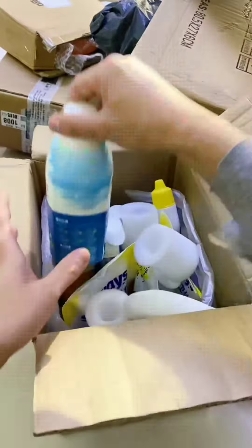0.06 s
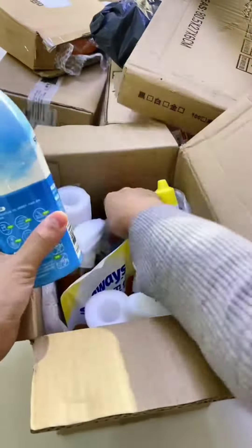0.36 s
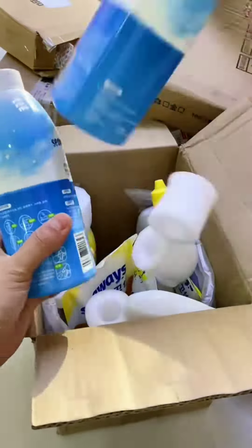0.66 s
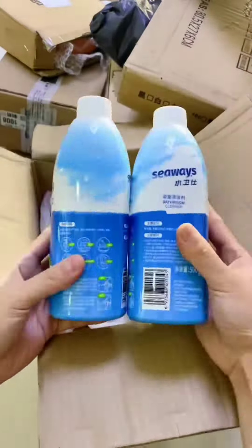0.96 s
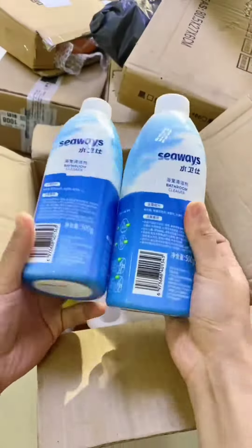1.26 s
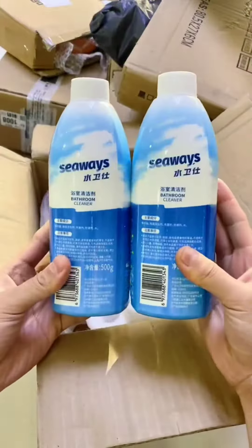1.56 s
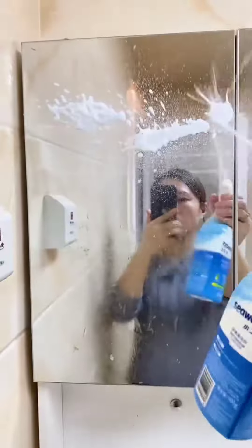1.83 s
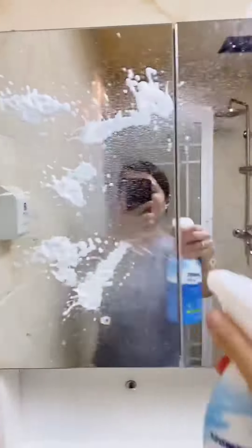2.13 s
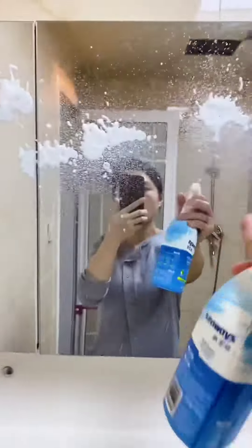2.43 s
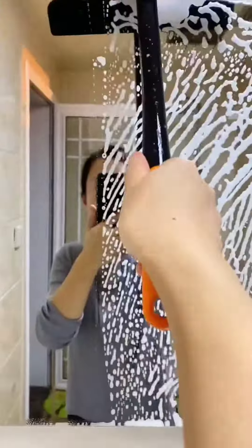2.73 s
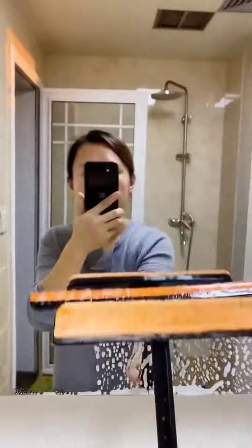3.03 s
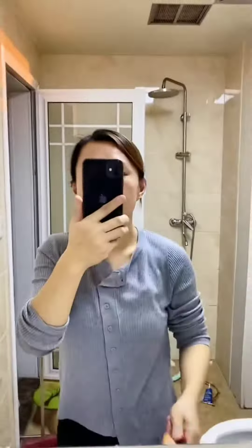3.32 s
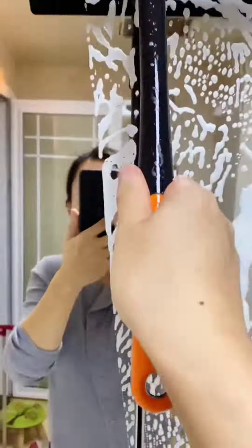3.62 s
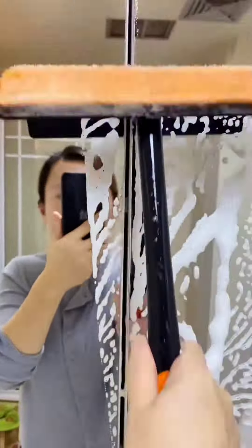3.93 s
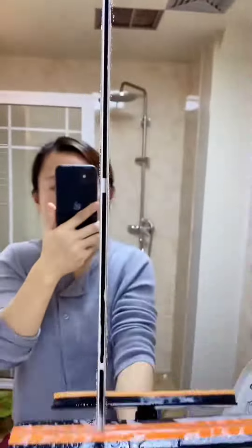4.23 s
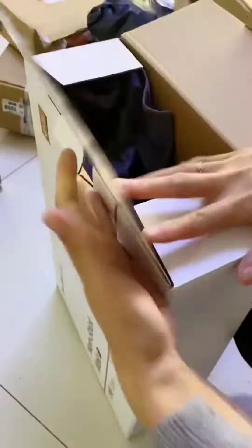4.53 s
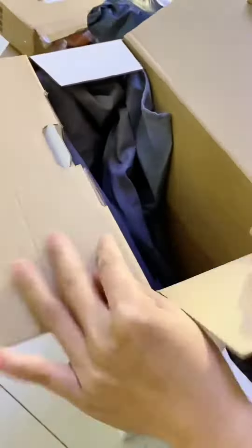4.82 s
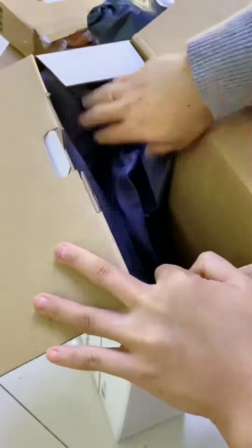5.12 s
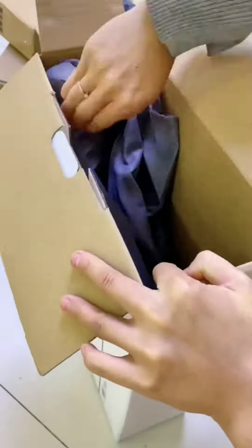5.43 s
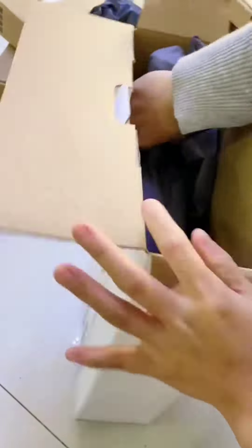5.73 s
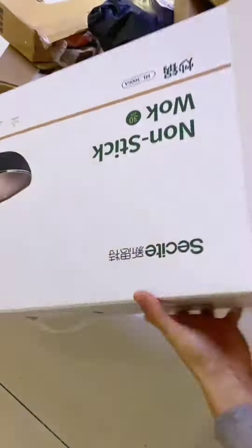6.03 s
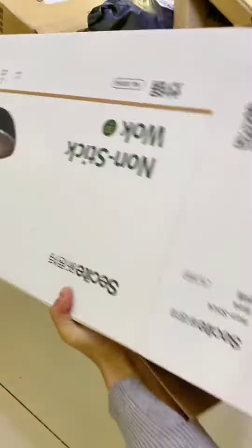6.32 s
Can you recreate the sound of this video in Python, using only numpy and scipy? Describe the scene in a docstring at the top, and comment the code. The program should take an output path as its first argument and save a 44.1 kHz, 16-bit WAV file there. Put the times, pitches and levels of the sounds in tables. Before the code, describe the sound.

Close indoor handling: tapping plastic bottles, rapid spray spurts, two booming squeegee strokes on glass, and a cardboard box being opened.

```python
"""First, plastic bottles rub and tap as they are lifted out of a carton; a full one swings by, rumbling.
From 1.6 s a trigger sprayer clicks and hisses foam onto a mirror. At 2.7 s and 3.7 s a rubber squeegee
sticks and slips down the glass, making it boom; between the two strokes it clacks against the mirror.
From 4.2 s the flaps of a cardboard box scrape, knock and crack open, and a smaller box is dragged out.
Everything is heard close up, in small rooms."""
import sys
import numpy as np
from scipy import signal
from scipy.fft import rfft, irfft
from scipy.io import wavfile
from scipy.ndimage import uniform_filter1d

SR = 44100
rng = np.random.default_rng(int(sys.argv[2]) if len(sys.argv) > 2 else 0)


def unload_audio(sound):
    """Save the sound as a 16-bit wav file, at the path given as the first command line argument."""
    columns = np.transpose(np.atleast_2d(sound))
    # keep every value between -1 and 1, then stretch to whole-number steps
    steps = np.round(np.clip(columns, -1, 1) * 32767)
    wavfile.write(sys.argv[1], SR, steps.astype(np.int16))


N = 285327
TIME, FREQS = np.arange(N) / SR, np.fft.rfftfreq(N, 1 / SR)
BRIEF = TIME[:SR // 5]  # the clock for one short sound
BRIEF_FREQS = np.fft.rfftfreq(len(BRIEF), 1 / SR)
HAND_ATTACK_S, HAND_RELEASE_S = 0.011, 0.038


def amp(db):
    """Turns decibels into a number to multiply by."""
    return 10 ** (np.asarray(db) / 20)


def evened(x):
    """Scales a signal to an average strength (rms) of 1."""
    return x / np.sqrt(np.mean(x ** 2) + 1e-20)


def read(points, hz):
    """Looks up a value between the rows of a frequency table."""
    f, value = np.transpose(points)
    return np.interp(np.log(hz + 1), np.log(f + 1), value)


def add(mix, s, sound):
    """Mixes a sound in at s seconds."""
    part = mix[max(round(s * SR), 0):][:len(sound)]
    part += sound[:len(part)]


def during(span):
    """Full volume from the start to the end of a span, silence outside it."""
    return amp(np.interp(TIME, span, [0, 0], left=-150, right=-150))


def above(hz, edge_hz):
    """A steep filter curve that lets through what is higher than the edge."""
    return 1 / np.sqrt(1 + (edge_hz / (hz + 1)) ** 10)


def shaped(x, curve):
    """Filters a full-length signal and sets its strength to 1."""
    return evened(irfft(rfft(x) * curve, N))


def noise(curve):
    """Fresh noise, coloured by a filter curve."""
    return shaped(rng.standard_normal(N), curve)


def tilted(tone, tilt_db, hz):
    """A tone colour made brighter or duller by tilt_db per octave, turning about 2 kHz."""
    return amp(read(tone, hz) + tilt_db * np.log2(np.maximum(hz, 300) / 2000))


def drift(hz):
    """A random wobble, up to about hz times a second."""
    return noise(np.exp(-(FREQS / hz) ** 2))


def progress(start, length):
    """Runs from 0 to 1 along a movement."""
    return np.clip((TIME - start) / length, 0, 1)


def stroke(start, length, attack_s, release_s, change_db):
    """Loudness of one movement: it gets going, steadily grows or weakens, and dies away."""
    slope = amp(change_db * (progress(start, length) - .5))
    fade = np.exp(-np.maximum(TIME - start - length, 0) / release_s)
    return progress(start, attack_s) * slope * fade


def grains(size, per_s, spread_db, smooth):
    """Friction: tiny random slips over a smooth hiss; spread_db makes their sizes more unequal."""
    slips = rng.standard_normal(size) * amp(spread_db * np.minimum(rng.exponential(1, size), 4))
    slips *= rng.random(size) < per_s / SR
    return evened(slips) + smooth * rng.standard_normal(size)


def rubbing(moves, tone, change_db, catch_db, per_s, spread_db):
    """Surfaces slide and catch: a low rumble, a scrape in the middle and a fizz on top."""
    rumble, scrape, fizz = np.zeros((3, N))
    for start, length, db, rumble_db, fizz_db in moves:
        effort = amp(db) * stroke(start, length, HAND_ATTACK_S, HAND_RELEASE_S, change_db)
        rumble = np.hypot(rumble, effort * amp(rumble_db))
        scrape = np.hypot(scrape, effort)
        fizz = np.hypot(fizz, effort * amp(fizz_db))
    slips = grains(N, per_s, spread_db, smooth=0.99) * amp(catch_db * drift(49))
    colour, mid, top = amp(read(tone, FREQS)), above(FREQS, 428), above(FREQS, 3630)
    return (rumble * noise(colour * np.sqrt(1 - mid ** 2))
            + scrape * shaped(slips, colour * mid * (1 - top))
            + fizz * shaped(slips, colour * top))


def contacts(rows, tone, gain_db, t60, crack, crack_s):
    """Hard hits: a sharp crack, then a noisy ring that takes t60 seconds to fade by 60 dB."""
    out = np.zeros(N)
    fade = amp(-60 * BRIEF / t60) + crack * np.exp(-BRIEF / crack_s)
    for s, db, tilt_db, *_ in rows:
        curve = np.maximum(evened(tilted(tone, tilt_db, BRIEF_FREQS)), 1e-4)
        # a minimum-phase filter, so nothing sounds before the hit
        log_curve = np.log(np.r_[curve, curve[-2:0:-1]])
        colour = np.exp(signal.hilbert(log_curve).conj())[:len(curve)]
        burst = rng.choice([-1, 1], len(BRIEF)) * fade
        add(out, s, amp(db + gain_db) * irfft(rfft(burst) * colour))
    return out


def ringing(hits, notes, swell_s, hold_s):
    """At each hit (t/s, level/dB) a thing's own notes swell, hold while it is pushed, then fade."""
    out, ring = np.zeros(N), np.zeros(len(BRIEF))
    for hz, db, t60 in notes:
        fade = amp(db - 60 * np.maximum(BRIEF - hold_s, 0) / t60)
        ring += fade * np.sin(2 * np.pi * (hz * BRIEF + rng.random()))
    for s, db in hits:
        add(out, s, amp(db) * np.minimum(BRIEF / swell_s, 1) * ring)
    return out


def thump(s, db, hz, swell_s, fall):
    """A blow on a hollow panel: high notes cross it first, so the pitch drops, passing hz early on."""
    out = np.zeros(N)
    pitch = hz * (.005 / (BRIEF + .0005)) ** fall
    push = BRIEF / swell_s * np.exp(1 - BRIEF / swell_s)
    add(out, s, amp(db - 1.04) * push * np.sin(2 * np.pi * np.cumsum(pitch) / SR))
    return out


def rattling(thumps):
    """Adds the buzz of loose layers that shake with each thump."""
    buzz = noise(above(FREQS, 170) / (1 + (FREQS / 690) ** 2) * (1 - above(FREQS, 1500)))
    return thumps + 0.23 * abs(thumps) * buzz


def slides(rows, tone, gain_db, per_s, spread_db, ring):
    """Quick scrapes: a burst of slips swells and fades, ringing the spot that it scrapes."""
    out, size, middle = np.zeros(N), len(BRIEF), BRIEF.mean()
    for s, db, length, spot_hz in rows:
        spot = 1 + ring / (1 + (np.log2((BRIEF_FREQS + 1) / spot_hz) / 0.47) ** 2)
        colour = amp(read(tone, BRIEF_FREQS)) * above(BRIEF_FREQS, 396) * spot
        slips = irfft(rfft(grains(size, per_s, spread_db, smooth=0.84)) * colour, size)
        swell = np.exp(-2 * ((BRIEF - middle) / length) ** 2)
        add(out, s - middle, amp(db + gain_db) * evened(slips) * swell)
    return out


def roaming(x, patchy_db):
    """As the touching point moves, other spots ring, so the tone colour shifts in patches."""
    spectrum = signal.stft(x, nperseg=512)[2]
    patches = uniform_filter1d(rng.standard_normal(spectrum.shape), size=4, axis=0)
    patches = uniform_filter1d(patches, size=6, axis=1)
    return signal.istft(spectrum * amp(patchy_db * evened(patches)), nperseg=512)[1][:N]


def still_air():
    """The faint, dull background of a quiet room."""
    return amp(-68) * noise(1 / (1 + FREQS / 400))


# tone colour of rubbed bottles: f/Hz, level/dB
BOTTLE_TONE = [(30, -16.5), (70, 2), (140, -0.5), (350, -0.5), (600, -13.5), (2300, -13.5), (5000, -13),
               (16000, -23)]
# hand movements: t/s, length/s, scrape level/dB, rumble over scrape/dB, fizz over scrape/dB
BOTTLE_MOVES = [(-.02, 0.095, -44.5, 5, 3), (.12, 0.29, -58, 13, -0.5), (.212, 0.2, -39, 1, -5),
                (.44, 0.46, -55.5, 8.5, 4), (.615, 0.036, -42.5, 12, 0.5), (.7, 0.074, -52, 9.5, 7.5),
                (.91, 0.17, -54, -3, 7), (1.175, 0.11, -62.5, -4.5, 6.5)]
# quick slides of plastic: middle t/s, level/dB, length/s, ringing f/Hz
BOTTLE_SLIDES = [(.297, -26, 0.019, 1415), (.347, -23, 0.015, 3820), (.394, -24, 0.016, 1490)]
def bottle_rubbing():
    """Plastic bottles rub and slide as they are lifted out."""
    return (rubbing(BOTTLE_MOVES, BOTTLE_TONE, change_db=-2.5, catch_db=3, per_s=3400, spread_db=0)
            + slides(BOTTLE_SLIDES, BOTTLE_TONE, gain_db=0.3, per_s=3900, spread_db=1, ring=0.37))


# tone colour of tapped plastic: f/Hz, level/dB
TAP_TONE = [(200, -7), (500, -16.5), (1250, 3), (1700, 2.5), (2500, -2.5), (4200, -5), (15000, -15)]
# notes of a bottle wall: f/Hz, level/dB, fade time/s
WALL_NOTES = [(2080, -1.5, 0.016), (2336, -1, 0.013), (2540, -3, 0.018), (2910, -4, 0.015),
              (4660, -13, 0.0068)]
# bottles meet: t/s, level/dB, tilt/(dB per octave), wall ring/dB, hollow note/dB
BOTTLE_TAPS = [(.008, -18, -4, -24, -28), (0.2204, -14, 0, -43, -15.5), (0.3803, -13.5, -2.5, -34, -33),
               (.399, -21.5, 1, -42, -42), (0.5517, -20.5, 4, -30.5, -23.5), (0.6479, -10, 3, -12, -18.5),
               (0.6525, -25.5, 1.5, -28, -25), (.738, -20.5, 2, -19, -24), (.861, -23.5, -5.5, -38, -23.5)]
def bottle_taps():
    """Bottles tap each other. Gives the ringing taps and, separately, the hollow notes that answer."""
    clicks = contacts(BOTTLE_TAPS, TAP_TONE, gain_db=-4, t60=0.012, crack=0.67, crack_s=0.00043)
    wall_hits = [(s, db) for s, _, _, db, _ in BOTTLE_TAPS]
    walls = ringing(wall_hits, WALL_NOTES, swell_s=0.00028, hold_s=0)
    hollow = sum(thump(s, db, hz=314, swell_s=0.0035, fall=0.59) for s, *_, db in BOTTLE_TAPS)
    return clicks + walls, hollow


def bottle_swing():
    """A full bottle is swung close by; it and its liquid give a deep, lumpy rumble."""
    deep = noise(above(FREQS, 34) / np.sqrt(1 + (FREQS / 129) ** 6))
    return amp(-23.5) * stroke(start=.7, length=0.178, attack_s=0.008, release_s=0.0066, change_db=-3) * deep


# soft bumps: t/s, level/dB, f/Hz
BUMPS = [(0.706, -19, 67.6), (0.761, -19.5, 210), (.838, -23.5, 96), (2.676, -26.5, 132.4),
         (3.003, -18, 155), (3.022, -8.5, 119), (3.04, -16, 153), (3.203, -20.5, 109), (3.505, -24, 125),
         (3.53, -25.5, 128), (4.153, -20.5, 155), (4.266, -19.5, 152), (4.444, -20, 98), (4.597, -18, 110),
         (5.031, -18, 228), (5.299, -17, 77), (5.318, -27, 264), (5.421, -14.5, 77), (5.528, -16.5, 92),
         (5.578, -9.5, 80), (5.586, -12, 176), (5.59, -19, 310), (6.215, -11.5, 508), (6.309, -13, 197)]
def soft_bumps():
    """Hands and loads bump hollow panels; the lower the note, the more slowly it swells."""
    return sum(thump(s, db, hz, swell_s=0.0061 * (200 / hz) ** 0.45, fall=0.15) for s, db, hz in BUMPS)


# tone colour of the spray hiss as heard, with two narrow treble dips: f/Hz, level/dB
HISS_TONE = [(300, -18), (1000, -13), (2000, -17.5), (2700, -5.5), (3400, -7.5), (5200, 0.5), (6300, 0),
             (7200, -24), (8300, 2), (10000, -8), (12300, 2), (15500, -2)]
# tone colour of the pump in the hand: f/Hz, level/dB
PUMP_TONE = [(30, -21), (130, 0), (330, -3.5), (700, -15), (3000, -6), (10000, -18.5)]
# trigger pulls (the first only primes the pump): loudest t/s, level/dB, rise time/s
PULLS = [(1.578, -36, 0.0046), (1.65, -31.5, 0.0043), (1.738, -30, 0.014), (1.822, -28.5, 0.0083),
         (1.902, -28, 0.0073), (2.002, -29.5, 0.01), (2.097, -29.5, 0.0056), (2.191, -30, 0.013),
         (2.286, -29.5, 0.014), (2.376, -29, 0.0098), (2.472, -26, 0.017)]
def sprayer():
    """Each pull fires a bright spurt, then a duller one as the pressure drops; the pump rubs along."""
    fade_s, tail_delay_s, tail_width_s = 0.013, 0.029, 0.011
    spurt, tail = np.zeros((2, N))
    middle = BRIEF.mean()
    since = BRIEF - middle
    for s, db, rise_s in PULLS:
        width = np.where(since < 0, rise_s, fade_s)
        add(spurt, s - middle, amp(db) * np.exp(-(since / width) ** 2 / 2))
        add(tail, s - middle, amp(db - 7) * np.exp(-((since - tail_delay_s) / tail_width_s) ** 2 / 2))
    mist = grains(N, per_s=9000, spread_db=0.77, smooth=1) * amp(2.3 * drift(100))
    bright = (amp(-71.5) + spurt) * shaped(mist, amp(read(HISS_TONE, FREQS)))
    dull = tail * shaped(mist, tilted(HISS_TONE, -2, FREQS))
    slips = grains(N, per_s=1500, spread_db=1.7, smooth=0.77) * amp(0.8 * drift(27))
    pump = amp(-47) * shaped(slips, amp(read(PUMP_TONE, FREQS)))
    bottle_note = amp(-54.5) * noise(1 / (1 + ((FREQS - 332) / 55) ** 2))
    return during(SPANS[2]) * (bright + dull + pump + bottle_note)


# clicks: t/s, level/dB, tilt/(dB per octave)
TRIGGER_CLICKS = [(1.5769, -34.5, 14), (1.8735, -28, 2.5), (1.883, -27, -5.5)]
def trigger_clicks():
    """The plastic trigger clicks on some pulls."""
    return contacts(TRIGGER_CLICKS, TAP_TONE, gain_db=-5, t60=0.018, crack=0.3, crack_s=0.0008)


# wet sputters: middle t/s, level/dB, length/s, ringing f/Hz
SQUELCHES = [(1.795, -38.5, 0.0046, 1200), (1.88, -41.5, 0.0078, 2450)]
def nozzle_squelches():
    """Foam sputters at the nozzle in tiny bursts."""
    return slides(SQUELCHES, PUMP_TONE, gain_db=4.5, per_s=1430, spread_db=2.5, ring=2)


WIPE_RELEASE_S = 0.059  # how quickly the blade stops
# squeegee strokes: t/s, length/s, rise time/s, boom level/dB, groan over boom/dB, judder start f/Hz,
# judder end f/Hz, pitch wobble/fraction, level wobble/dB, groan start f/Hz, groan end f/Hz
WIPES = [(2.712, 0.224, 0.052, -18, -15, 145.5, 138, 0.028, 1, 250, 288.8),
         (3.707, 0.39, 0.12, -22.5, -6.5, 122.2, 139.2, 0.036, 3.5, 184.5, 293)]
def squeegee_judder(start, length, attack_s, db, groan_db, first_hz, last_hz, jitter, uneven_db,
                    groan_first_hz, groan_last_hz):
    """Rubber sticks and slips: the mirror booms at that rate while a stiffer part groans upward."""
    along, braking = progress(start, length), progress(start + length, WIPE_RELEASE_S)
    judder_hz = first_hz + (last_hz - first_hz) * along
    judder_hz *= (1 + 0.043 * np.sin(np.pi * along)) * (1 - 0.12 * braking)  # faster midway, then slower
    judder_phase = 2 * np.pi * np.cumsum(judder_hz * (1 + jitter * drift(53))) / SR
    groan_hz = groan_first_hz + (groan_last_hz - groan_first_hz) * along
    groan_phase = 2 * np.pi * np.cumsum(groan_hz * (1 + 0.075 * drift(59.1))) / SR
    boom = evened(np.sin(judder_phase) * amp(uneven_db * drift(47)))
    groan = evened(np.sin(groan_phase) * (1 + 0.5 * drift(70))
                   + 0.32 * np.sin(groan_phase + judder_phase) * drift(64)
                   + 0.35 * np.sin(groan_phase - judder_phase / 2) * drift(80)
                   + 0.41 * np.sin(2 * judder_phase) * drift(50))
    groan *= amp(groan_db - 24.5 * (along - 0.72) ** 2)  # loudest late in the stroke
    pane_note = amp(-9) * np.sqrt(along) * noise(np.exp(-((FREQS - 100) / 18) ** 2))
    effort = amp(db) * stroke(start, length, attack_s, WIPE_RELEASE_S, change_db=-1)
    return effort * (boom + pane_note + groan)


# tone colour of wiped glass: f/Hz, level/dB
GLASS_TONE = [(30, -20), (55, -6), (92, -4.5), (170, -19.5), (350, -20), (600, -25.5), (900, -27.5),
              (1300, -34.5), (4500, -46.5), (7000, -48), (15000, -56.5)]
def foam_swish():
    """The mirror rumbles and the foam swishes under the blade, flaring as it runs off the edge."""
    wiping, runoff = np.zeros((2, N))
    for start, length, attack_s, *_ in WIPES:
        wiping += stroke(start, length, attack_s, WIPE_RELEASE_S, change_db=-1.5)
        runoff += np.exp(-((TIME - start - length - 0.093) / 0.048) ** 2)
    # the wet blade is shifted for the second stroke
    shift = stroke(3.19, 0.3, HAND_ATTACK_S, HAND_RELEASE_S, change_db=-15.5)
    rumble_gain = amp(-43.5) + amp(-41.5) * (wiping + runoff)
    swish_gain = amp(-64) + amp(-63) * (wiping + amp(13.5) * runoff) + amp(-55.5) * shift
    colour, top = amp(read(GLASS_TONE, FREQS)), above(FREQS, 1190)
    rumble = noise(colour * (1 - top))
    swish = shaped(rng.standard_normal(N) * amp(0.9 * drift(36)), colour * top)
    return during(SPANS[3]) * (rumble_gain * rumble + swish_gain * swish)


# tone colour of the blade on the mirror: f/Hz, level/dB
CLACK_TONE = [(150, -11), (300, -1), (470, -2.5), (630, -9.5), (900, -4.5), (1250, -13.5), (1700, -9.5),
              (3200, -9), (6400, -11), (11000, -21.5), (16000, -32.5)]
# scuffs: middle t/s, level/dB, length/s, ringing f/Hz
BLADE_SCRAPES = [(3.018, -21, .014, 830), (3.047, -35, 0.015, 450), (3.292, -45, 0.028, 3000),
                 (3.343, -44.5, 0.018, 1800), (3.472, -47.5, .016, 1500), (4.167, -39, 0.035, 750)]
def blade_scrapes():
    """The blade scuffs the mirror and its frame."""
    return slides(BLADE_SCRAPES, CLACK_TONE, gain_db=-0.5, per_s=3100, spread_db=0, ring=2.8)


# clacks: t/s, level/dB, tilt/(dB per octave)
BLADE_CLACKS = [(3.019, -16.5, -4.5), (3.143, -44, 2.5), (3.1962, -10.5, 4), (3.2003, -15, 1),
                (3.218, -24.5, -0.5), (4.162, -20.5, -7)]
# notes of the handle: f/Hz, level/dB, fade time/s
HANDLE_NOTES = [(489, -1.5, 0.066), (3220, -2, 0.067), (4030, -2.5, 0.052), (4940, -9, .05),
                (6100, -2.5, .055), (9250, -2, .04)]
def blade_clacks():
    """The squeegee hits the mirror; the hardest hit rings its handle."""
    clacks = contacts(BLADE_CLACKS, CLACK_TONE, gain_db=2.5, t60=0.048, crack=0.099, crack_s=0.00068)
    return clacks + ringing([(3.1965, -17)], HANDLE_NOTES, swell_s=0.0027, hold_s=0.002)


# tone colour of rubbed cardboard: f/Hz, level/dB
CARD_TONE = [(30, -10), (80, 0.5), (330, -4.5), (600, -11.5), (900, -16), (1600, -15.5), (2400, -17.5),
             (4200, -22.5), (6300, -22), (9000, -27), (15000, -26.5)]
# hand movements: t/s, length/s, scrape level/dB, rumble over scrape/dB, fizz over scrape/dB
CARD_MOVES = [(4.23, 0.29, -48.5, 8, 5), (4.555, 0.22, -40, 5.5, 4), (4.75, 0.098, -46, 5.5, -3),
              (4.97, 0.061, -59.5, 10.5, -2), (5.025, 0.16, -38.5, 1, -2), (5.24, 0.16, -43.5, 5.5, 1.5),
              (5.345, 0.15, -36, -0.5, 2.5), (5.52, 0.075, -32.5, 2.5, 5.5), (5.6, 0.62, -43, 0, 1),
              (6.024, 0.074, -34.5, 4, -9.5), (6.15, 0.13, -39.5, 8.5, 6.5), (6.29, 0.16, -34.5, -4.5, 2.5)]
# quick slides of cardboard: middle t/s, level/dB, length/s, ringing f/Hz
CARD_SLIDES = [(4.262, -27, 0.013, 880), (4.39, -32.5, 0.06, 13800), (4.717, -29, 0.014, 11800),
               (4.772, -26.5, 0.022, 1430), (4.791, -23, 0.008, 1410), (4.868, -31, 0.019, 14000),
               (5.16, -33, 0.031, 10500), (5.478, -28.5, 0.015, 6800), (5.576, -28, 0.011, 8700),
               (5.661, -22.5, 0.015, 1200), (6.185, -28, 0.053, 400), (6.226, -25.5, 0.054, 636),
               (6.262, -28.5, 0.063, 14200), (6.413, -29, 0.017, 1400)]
def cardboard_rubbing():
    """Flaps and the smaller box drag along: the panels rumble, the fibres scrape and fizz."""
    return (rubbing(CARD_MOVES, CARD_TONE, change_db=2, catch_db=2.5, per_s=1800, spread_db=2.5)
            + slides(CARD_SLIDES, CARD_TONE, gain_db=1, per_s=7400, spread_db=2, ring=3.2))


# tone colour of snapping cardboard: f/Hz, level/dB
SNAP_TONE = [(200, -2), (600, -12), (3400, -21.5), (15000, -23.5)]
# flaps hit the box: t/s, thump level/dB, f/Hz, snap level/dB
FLAP_KNOCKS = [(4.248, -21, 270, -22), (4.411, -8, 281, -21), (4.497, -20.5, 120, -24.5),
               (4.734, -8, 309, -11.5), (5.371, -18, 280, -28), (5.418, -22.5, 597, -39),
               (6.029, -16.5, 227, -48), (6.197, -12, 286, -28)]
# creases crack: t/s, level/dB, tilt/(dB per octave)
CREASE_CRACKS = [(4.6747, -25.5, 1), (5.455, -24.5, 0.5), (5.5078, -22, 3), (5.5587, -15, 3.5),
                 (5.621, -27, -1.5), (6.215, -20.5, -5)]
def flap_knocks():
    """Flaps knock on the box and their creases crack. Gives the snaps and the thumps separately."""
    hits = CREASE_CRACKS + [(s, db, 0) for s, _, _, db in FLAP_KNOCKS]
    snaps = contacts(hits, SNAP_TONE, gain_db=0.5, t60=0.046, crack=1.25, crack_s=0.0011)
    thumps = sum(thump(s, db, hz, swell_s=0.0034, fall=0.59) for s, db, hz, _ in FLAP_KNOCKS)
    return snaps, thumps


# notes of the hollow box: f/Hz, level/dB, fade time/s
BOX_NOTES = [(378.5, 0.5, 0.027), (916, -12, 0.015)]
def lid_pop():
    """The lid pulls free and the hollow box hoots."""
    return ringing([(4.2525, -12.5)], BOX_NOTES, swell_s=0.008, hold_s=0.016)


# notes of a flap: f/Hz, level/dB, fade time/s
FLAP_NOTES = [(863, 2, 0.11), (1050, 2, 0.036), (1260, -13, 0.026), (1584, -2, 0.064), (1900, -5, .04)]
def flap_spring():
    """A flap springs back and rings."""
    return ringing([(5.654, -25)], FLAP_NOTES, swell_s=0.0023, hold_s=0.0044)


def reflections(t60):
    """A small room's quickly fading echoes, one set for each side."""
    shape = (2, len(BRIEF))
    echoes = rng.standard_normal(shape) * (rng.random(shape) < .1)
    echoes *= amp(-60 * BRIEF / t60) * (BRIEF > .001)
    return echoes / np.linalg.norm(echoes, axis=1, keepdims=True)


# how alike left and right are: f/Hz, likeness/fraction
LIKENESS = [(150, .98), (500, .84), (1100, .8), (2200, .62)]
# how far the left wave runs ahead: f/Hz, lead/radians
LEFT_LEAD = [(500, 0), (3000, .45), (5300, 1.1), (7400, 3.1), (8000, .3), (15000, .2)]
# left compared with right: f/Hz, level/dB
BALANCE = [(120, -0.86), (500, -1.3), (8000, 0.11)]
def room(direct, sent, t60):
    """Left and right hear the direct sound a little apart, and each its own echoes of what is sent."""
    turn = np.pi * TIME / .17 / 2  # things move, so two sets of echoes trade places every 0.17 s
    echoes = sum(signal.oaconvolve((sent * share)[None], reflections(t60), axes=1)[:, :N]
                 for share in (np.cos(turn), np.sin(turn)))
    echo_share = 0.0022 + (1 - read(LIKENESS, FREQS)) * above(FREQS, 230) ** 2  # hardly any in the bass
    side = np.array([[.5], [-.5]])
    balance = amp(side * read(BALANCE, FREQS) * above(FREQS, 200))
    lead = np.exp(1j * side * read(LEFT_LEAD, FREQS))
    blend = np.sqrt(1 - echo_share) * rfft(direct) + np.sqrt(echo_share) * rfft(echoes)
    return irfft(balance * lead * blend, N)


def scene():
    """Bottles and cardboard sound in a storeroom, sprayer and squeegee in a bathroom."""
    taps, bottle_thumps = bottle_taps()
    snaps, flap_thumps = flap_knocks()
    close = taps + snaps  # these are nearest, so less of them comes back from the room
    rubs = roaming(bottle_rubbing() + cardboard_rubbing(), patchy_db=2.5)
    thumps = rattling(bottle_thumps + soft_bumps() + flap_thumps)
    storeroom = still_air() + rubs + thumps + bottle_swing() + lid_pop() + flap_spring()
    spray = roaming(sprayer() + trigger_clicks() + nozzle_squelches(), patchy_db=2.5)
    wiping = sum(squeegee_judder(*wipe) for wipe in WIPES) + roaming(foam_swish(), patchy_db=3)
    bathroom = spray + wiping + blade_scrapes() + blade_clacks()
    return (room(storeroom + close, storeroom + amp(-7) * close, t60=0.057)
            + room(bathroom, bathroom, t60=0.067))


# stretches of sound (bottles twice, sprayer, squeegee, box): start t/s, end t/s
SPANS = [(0, .172), (.212, 1.53), (1.572, 2.54), (2.56, 4.202), (4.232, 6.48)]
def record(dry):
    """Leaves a brief silence between the stretches and takes off the very highest treble."""
    sounding = sum((TIME >= start) * (TIME < end) * 1. for start, end in SPANS)
    gated = dry * uniform_filter1d(sounding, size=100)
    low_pass = signal.firwin(255, 15900, window=("kaiser", 9), fs=SR)
    return signal.oaconvolve(gated, low_pass[None], "same")


dry = scene()
out = record(dry)
unload_audio(out)
```